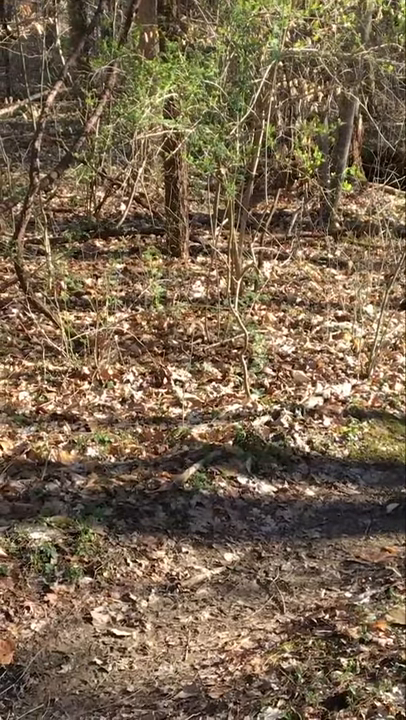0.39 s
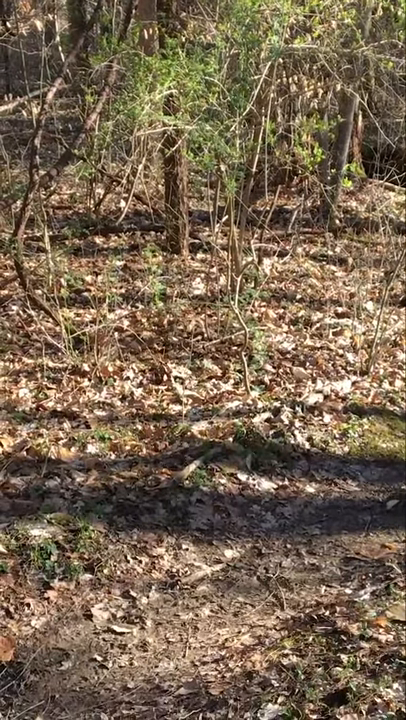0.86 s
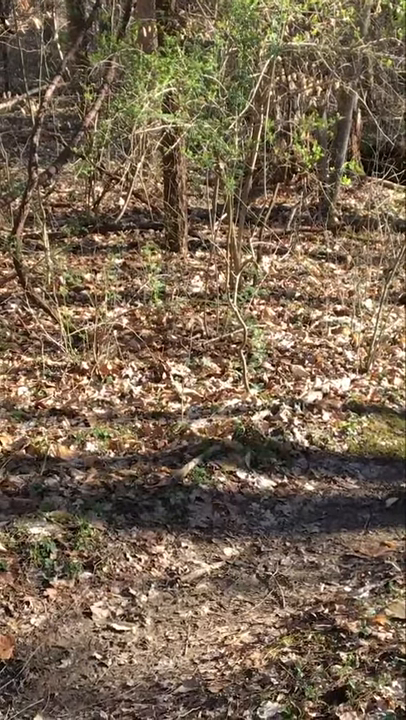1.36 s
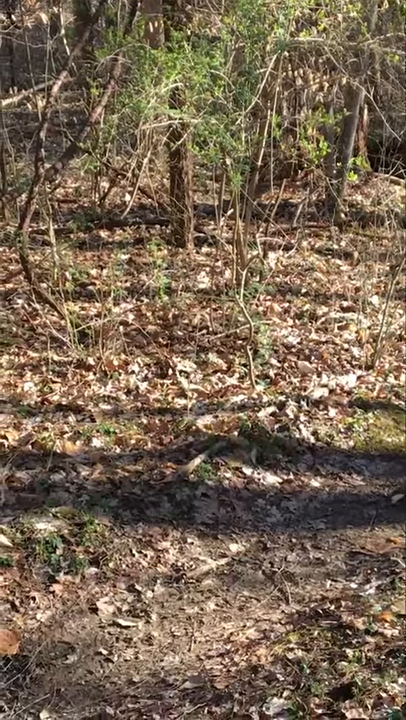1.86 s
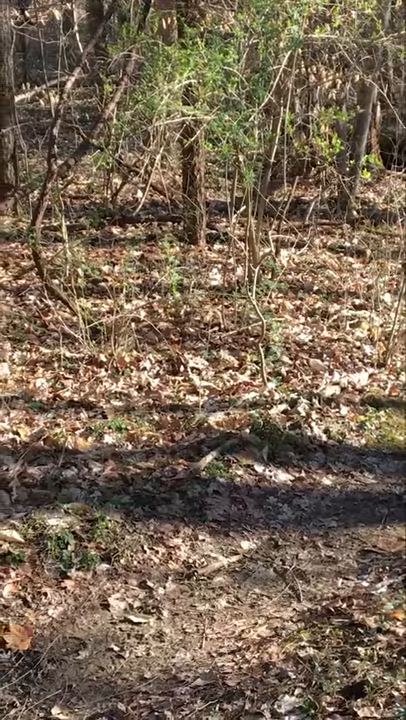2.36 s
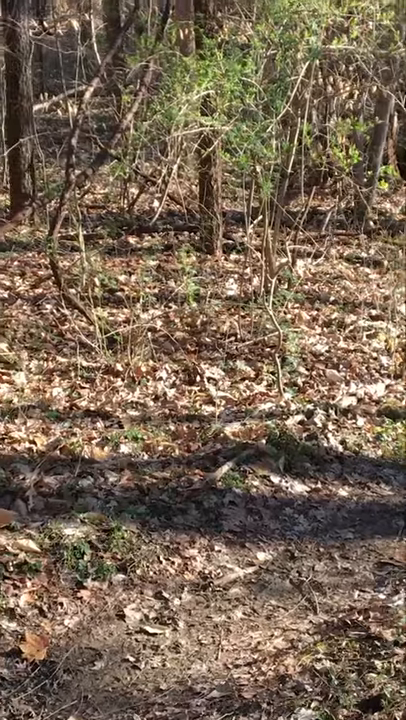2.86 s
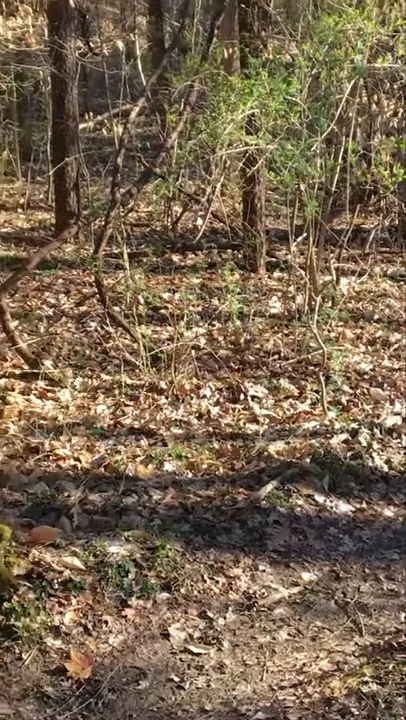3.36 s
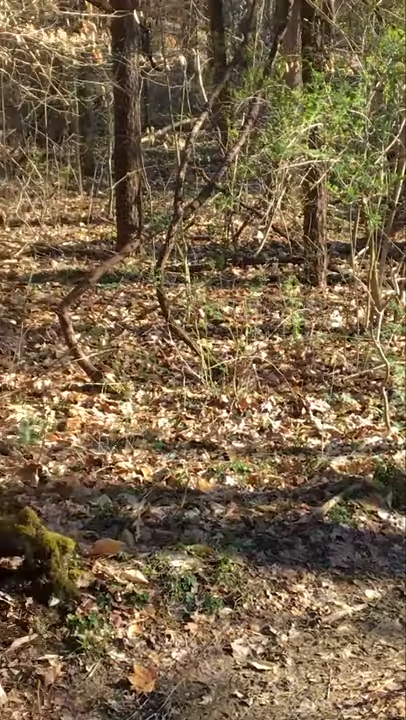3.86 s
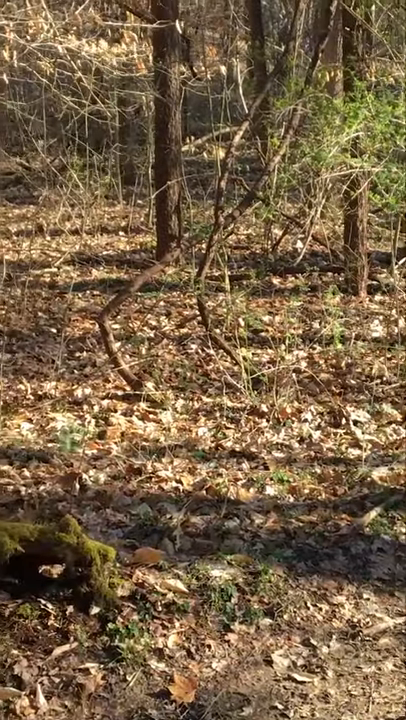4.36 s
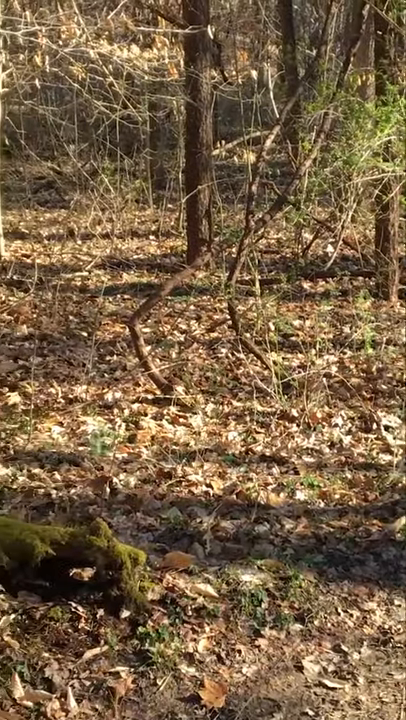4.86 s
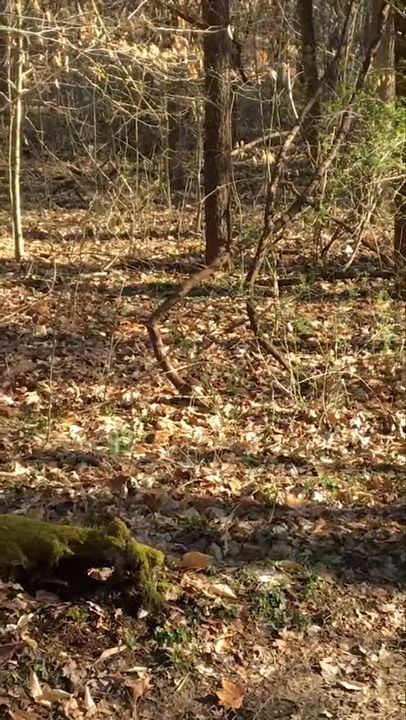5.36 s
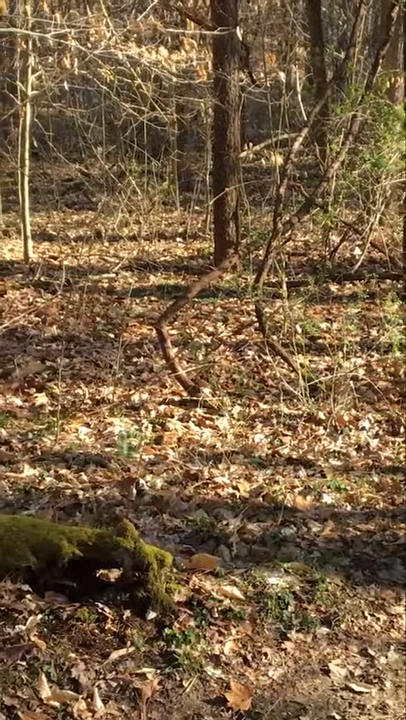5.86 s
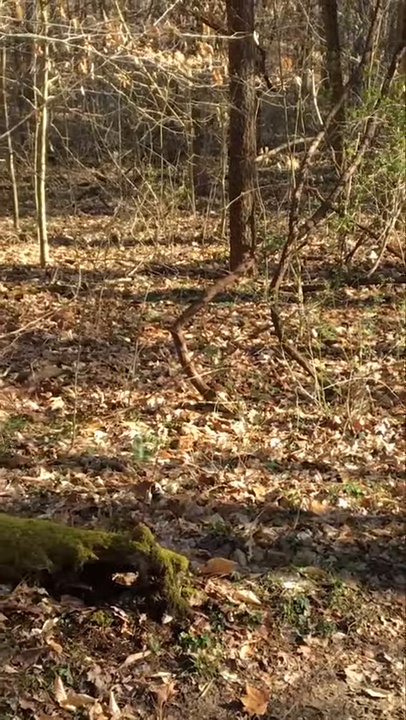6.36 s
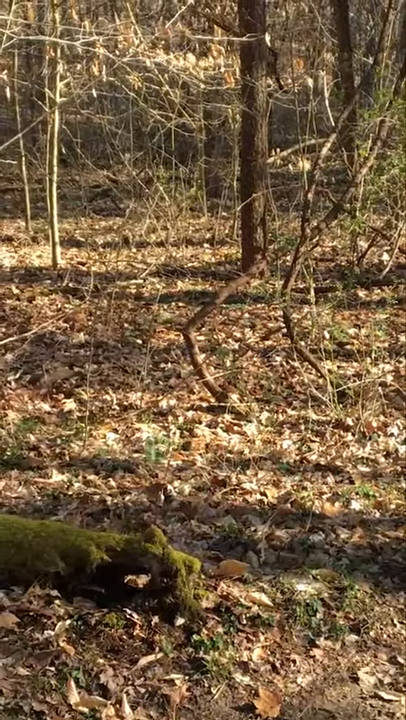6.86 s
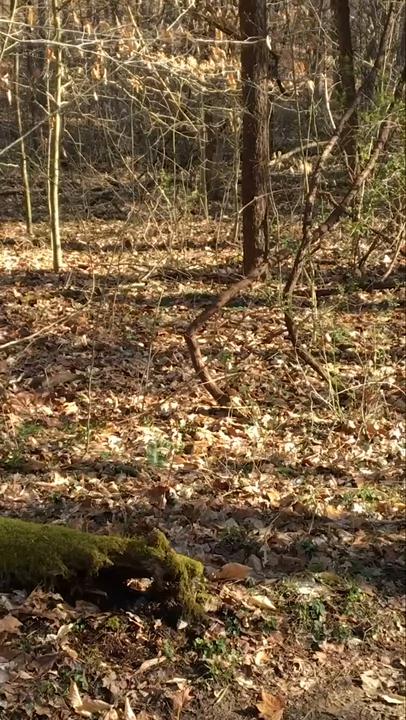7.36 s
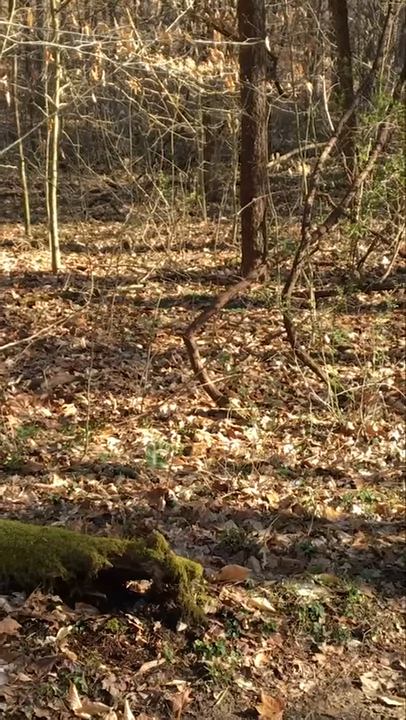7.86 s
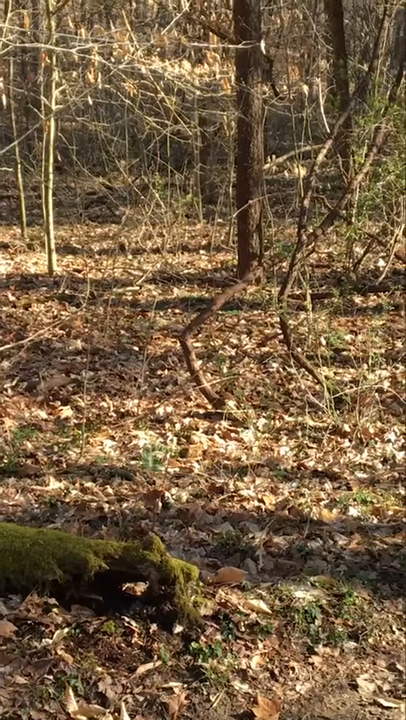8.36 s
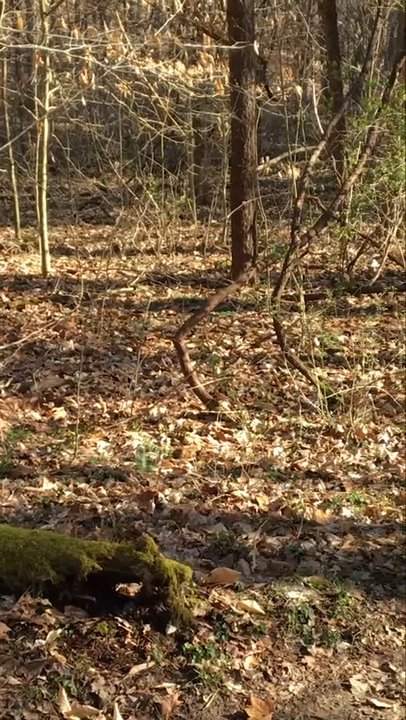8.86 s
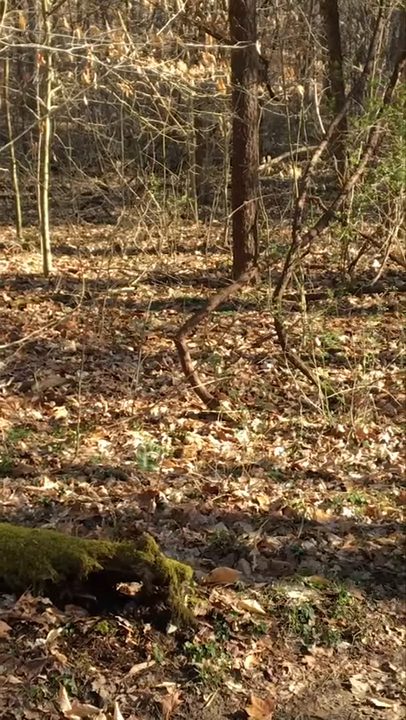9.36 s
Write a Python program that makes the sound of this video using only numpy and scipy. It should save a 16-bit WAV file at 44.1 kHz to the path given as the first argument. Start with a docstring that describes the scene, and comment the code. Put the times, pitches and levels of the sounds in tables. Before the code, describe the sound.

Small birds sing outdoors over a quiet, steady creek. First come spaced chips, then two strong downward slurs and a denser run of winding whistles, flicks and short burrs. Behind them another bird loops a low, wet-sounding phrase, then stops. More chips and falling whistles close the scene. Faint high notes come from distant birds, and dry twig snaps sound close to the handheld microphone.

```python
"""Songbirds trade whistled slurs, trills and sharp chip calls in a leafy wood, a third bird repeats a low
phrase further off and thin high notes come from distant singers. All are near-sine glides through listed
pitches. Random echoes scatter every note among trunks and leaves; filtered noise makes the rush of a creek
and a low rumble, and short noise bursts make the few twigs that tick near the microphone."""
import sys
import numpy as np
from scipy import signal
from scipy.fft import rfft, irfft
from scipy.io import wavfile
from scipy.ndimage import uniform_filter1d

SR = 44100
rng = np.random.default_rng(int(sys.argv[2]) if len(sys.argv) > 2 else 0)


def amplitude_ratio(level_db):
    """Convert a level in decibels to the matching linear amplitude (field) ratio."""
    exponent = np.asarray(level_db, float) / 20
    return 10 ** exponent


def transcribe(u):
    """Save the signal u as a 16-bit wav file named by the first command-line argument.

    u: samples, shape (n,) or (channels, n), limited to [-1, 1]; the rate is SR.
    q: integer samples, one column per channel.
    """
    v = np.clip(np.atleast_2d(u).T, -1, 1)
    q = np.round(v * 32767).astype(np.int16)
    wavfile.write(sys.argv[1], SR, q)


N = 418068


def walk(rate):
    """Random drift: levels held 1 / rate seconds and smoothed twice, with a spread near 1."""
    hold = int(SR / rate)
    held = np.repeat(rng.standard_normal(N // hold + 1), hold)
    return 1.92 * uniform_filter1d(uniform_filter1d(held, hold), hold)[:N]


def creek():
    """Rushing water and rumble: half-octave noise bands that swell together a little and flicker alone."""
    # Spectrum of water and rumble. Each row: frequency in Hz, relative density in dB per Hz.
    water_colour = [(12, -50), (20, -19), (39, -4.5), (60, 1), (86, -4.5), (113, -8.5), (158, -13),
                    (228, -13.5), (367, -17), (422, -22), (698, -23), (2530, -27), (5530, -37.5),
                    (8180, -37.5), (16000, -51)]
    creek_rms_db = -37.5
    hz = np.maximum(np.arange(N // 2 + 1) * SR / N, 1)
    points, db = np.transpose(water_colour)
    coloured = rfft(rng.standard_normal(N)) * amplitude_ratio(np.interp(np.log(hz), np.log(points), db))
    water, swell = 0, walk(0.8)
    for octave in np.arange(4, 14.6, .5):  # band centre is 2 ** octave Hz
        share = np.clip(1 - 2 * np.abs(np.log2(hz) - octave), 0, 1)
        flicker_db = 0.6 + 60 / 2 ** octave  # the lowest bands are the gustiest
        water = water + irfft(coloured * share, N) * amplitude_ratio(0.9 * swell + flicker_db * walk(9))
    return water * amplitude_ratio(creek_rms_db) / np.sqrt(np.mean(water ** 2))


def whistle(notes, round_s, edge_s, waver_db, order=(), partial_db=(), warble=0, top_hz=15500):
    """Near-sine notes: the pitch rounds its corners, the edges fade, weak partials ride along."""
    voice, waver = np.zeros(N), amplitude_ratio(waver_db * walk(120))
    warble = warble + np.zeros(N)
    for note in notes:
        s, hz, db = np.transpose(note)
        first = max(int((s[0] - edge_s) * SR), 0)
        i = np.arange(first, min(int((s[-1] + edge_s) * SR), N))
        t = i / SR
        pitch = uniform_filter1d(np.interp(t, s, hz), int(round_s * SR) + 1) + warble[i]
        phase = 2 * np.pi * np.cumsum(pitch) / SR
        edge = np.clip(np.minimum(t - s[0], s[-1] - t) / (2 * edge_s) + .5, 0, 1) ** 2
        # partials stay silent above top_hz
        upper = sum(amplitude_ratio(d) * (k * pitch < top_hz) * np.sin(k * phase) for k, d in zip(order, partial_db))
        voice[i] += np.sqrt(2) * amplitude_ratio(np.interp(t, s, db)) * edge * (np.sin(phase) + upper)
    return voice * waver


def strokes(shape, rows):
    """One gliding note a row, all with the same course in time."""
    share, way, shape_db = np.transpose(shape)
    return [np.transpose([s + share * length, first + way * (last - first), db + shape_db])
            for s, length, first, last, db in rows]


def far_notes():
    """Thin glides of distant birds, and the held end of one low phrase; the pitch trembles at random."""
    # A note starts firm and thins out. Each row: share of the length, share of the pitch change,
    # level in dB relative to the note.
    far_shape = [(0, 0.057, 5.5), (.4, .4, -1), (1, 0.94, -3.5)]
    # Each row: start in seconds, length in seconds, first pitch in Hz, last pitch in Hz, level in dB.
    # The flat 3.2 kHz row is the held end of the low singer's last syllable.
    thin_notes = [(.001, .2, 3200, 3140, -59), (.001, .12, 7940, 8080, -57.5),
                  (0.192, .08, 7650, 7500, -60), (.3, .035, 7130, 7090, -60),
                  (0.134, .135, 7960, 7930, -58), (.28, .06, 2140, 2180, -59), (.34, .057, 2180, 2640, -55),
                  (.37, .125, 8480, 8460, -51.5), (.47, .07, 3290, 4050, -59.5),
                  (.51, .03, 6600, 7100, -58), (0.551, .14, 8700, 8120, -50.5),
                  (.585, .03, 8350, 7600, -51), (.615, .06, 7600, 7850, -53),
                  (0.605, .03, 5590, 5760, -54.5), (.69, .108, 3720, 3830, -63),
                  (0.997, .03, 6800, 6810, -48), (1.08, .06, 2870, 3110, -59),
                  (1.137, .069, 3110, 4400, -56.5), (1.078, .04, 6900, 7050, -54),
                  (1.317, .04, 7380, 7230, -57), (1.601, .075, 8060, 8650, -57.5),
                  (1.95, .05, 8400, 8630, -58.5), (2.27, .056, 8300, 8160, -61),
                  (2.42, .02, 8500, 8510, -59), (2.763, .066, 7020, 7330, -62), (3.1, .04, 6750, 6800, -61),
                  (3.036, .135, 7620, 7770, -58.5), (3.242, .045, 8320, 7870, -60),
                  (3.699, .06, 10800, 12000, -56), (3.719, .07, 8360, 8300, -59),
                  (3.856, .1, 8420, 8530, -55), (4.084, .084, 7720, 7500, -54),
                  (4.399, .065, 7500, 6830, -54.5), (4.45, .062, 6950, 7230, -54),
                  (4.632, .078, 7960, 7550, -53), (4.903, .105, 7650, 8000, -54),
                  (5.18, .08, 8150, 7900, -49.5), (5.193, .012, 9410, 8180, -50),
                  (5.352, .036, 7900, 8000, -51), (5.491, .025, 7850, 6700, -47.5),
                  (5.51, .09, 8030, 7800, -52), (5.61, .015, 6800, 8200, -39),
                  (5.7, .08, 8480, 8470, -55.5), (5.91, .024, 7200, 7700, -48),
                  (6.427, .045, 5950, 5800, -53), (6.475, .023, 5840, 6640, -48),
                  (6.737, .093, 3180, 3250, -53), (6.84, .03, 8920, 7190, -50),
                  (6.872, .05, 9000, 8900, -57), (6.888, .024, 8300, 6860, -47.5),
                  (6.93, .018, 7940, 6580, -48), (7.21, .039, 744, 1200, -51), (7.55, .1, 7870, 7700, -62),
                  (7.734, .12, 7280, 6960, -58.5), (7.975, .123, 7550, 7200, -60),
                  (8.244, .115, 7230, 7400, -61), (8.447, .1, 7260, 7050, -59),
                  (8.511, .03, 766, 1000, -50), (8.69, .069, 7340, 7200, -59),
                  (8.812, .043, 6900, 7000, -55), (9.02, .021, 7650, 8050, -50)]
    return whistle(strokes(far_shape, thin_notes), 0.0085, 0.007, 2.6, warble=45 * walk(150))


def chips():
    """Steep falls that bob up; high chips climb on without the dip, a line at 1.5 times the pitch is harsh."""
    # After its steep fall a chip rounds off, bobs up, dips and weakens, then climbs again a little louder.
    # Each row: seconds from the lowest point, level in dB relative to the chip.
    chip_shape = [(-.0021, 2), (0, -4), (.0047, 2.5), (.0078, -7), (0.0148, -2.5)]
    # Each row: lowest point in seconds, lowest pitch in Hz, bob in Hz, end in Hz, level in dB.
    chip_calls = [(0.1385, 4620, 5590, 7740, -25.5), (.3665, 3700, 5400, 5970, -21),
                  (0.885, 3990, 5700, 7060, -20), (1.845, 4480, 5760, 7000, -29.5),
                  (3.023, 3940, 5350, 6340, -31.5), (3.2988, 4463, 5560, 7600, -25),
                  (5.1267, 3650, 5130, 6500, -29.5), (5.382, 5220, 7030, 8450, -30.5),
                  (5.634, 6760, 8230, 9300, -35), (5.701, 3290, 4460, 4480, -29.5),
                  (6.2, 4240, 6320, 6950, -36), (7.934, 3470, 5400, 5630, -22.5),
                  (8.590, 4080, 6180, 7700, -22)]
    top_hz, top_db, round_hz, fall_hz_per_s = 9000, -13.5, 1500, 990000
    dip_hz, high_chip_hz = 976, 5000
    lag, shape_db = np.transpose(chip_shape)
    notes = []
    for s, low, bob, end, db in chip_calls:
        fall_s = max(top_hz - low - round_hz, 100) / fall_hz_per_s
        dip = bob - dip_hz if low < high_chip_hz else (bob + end) / 2
        times = s + np.r_[lag[0] - fall_s, lag]
        pitches = [top_hz, low + round_hz, low, bob, dip, end]
        notes.append(np.transpose([times, pitches, db + np.r_[top_db, shape_db]]))
    return whistle(notes, 0.0014, .0005, 1.2, order=(1.5, 2, 3), partial_db=(-20, -30, -42))


def glides():
    """Single strokes of the song: short drops, rises, held notes and tumbles."""
    # Courses of the strokes. Each row: share of the length, share of the way from first to last pitch,
    # level in dB relative to the stroke.
    drop_shape = [(0, 0.092, 0), (.33, 0.32, 0), (.72, .8, -2.5), (1, 1, -15.5)]
    rise_shape = [(0, 0, 3.5), (.5, .6, -8), (1, 1, -9)]
    hold_shape = [(0, 0.14, -5.5), (.3, 0.16, 1), (.7, .7, -2), (1, 1, -1)]
    tumble_shape = [(0, 0.0069, -12.5), (.27, .17, -7.5), (.58, .41, -6), (.75, .66, -2), (.81, .76, 2),
                    (.88, .92, -4), (1, 0.94, -10)]
    # Strokes as sung. Each row: start in seconds, length in seconds, first pitch in Hz, last pitch in Hz,
    # level in dB.
    sung_drops = [(0.405, .015, 7600, 3670, -33.5), (1.372, .023, 6300, 2190, -39),
                  (4.718, 0.02, 8640, 2110, -28.5), (4.773, 0.026, 9250, 2090, -28),
                  (5.616, .019, 4880, 1954, -33.5), (6.64, 0.029, 6210, 1600, -35),
                  (7.364, .04, 7800, 2200, -49), (7.857, 0.024, 6200, 2240, -48)]
    sung_rises = [(5.42, 0.098, 2890, 4880, -37.5), (5.511, .016, 2900, 7700, -32),
                  (5.607, .01, 2970, 4900, -24.5)]
    sung_holds = [(0.351, 0.051, 6660, 7780, -32), (1.4, 0.034, 3200, 3100, -46),
                  (1.47, 0.14, 7700, 8100, -55), (5.43, 0.085, 2230, 2860, -37.5),
                  (5.525, .02, 7300, 8040, -40), (5.898, .027, 5400, 5100, -46),
                  (6.105, .025, 2660, 2800, -43), (6.255, 0.089, 3240, 2970, -42.5),
                  (9.078, 0.0087, 6440, 7950, -37), (9.086, 0.018, 7950, 7550, -45),
                  (9.347, .013, 6550, 7300, -36.5)]
    sung_tumbles = [(6.742, .122, 8780, 1760, -37), (7.44, .064, 7790, 1880, -36)]
    return (strokes(drop_shape, sung_drops) + strokes(rise_shape, sung_rises)
            + strokes(hold_shape, sung_holds) + strokes(tumble_shape, sung_tumbles))


def hooks():
    """Notes that flick up, dip and climb again, all from the same starting pitch."""
    # Each row: seconds from the start, level in dB relative to the hook.
    hook_shape = [(0, -2.5), (.012, -2), (0.021, 1), (.049, -8)]
    # Each row: start in seconds, top in Hz, dip in Hz, end in Hz, level in dB.
    sung_hooks = [(1.179, 9000, 6950, 8700, -39.5), (1.848, 8820, 6900, 8760, -40),
                  (7.072, 7840, 5380, 8800, -38), (7.7, 9000, 6920, 8500, -42.5)]
    start_hz = 4700
    lag, shape_db = np.transpose(hook_shape)
    return [np.transpose([s + lag, [start_hz, *hz], db + shape_db]) for s, *hz, db in sung_hooks]


def syllables(shape, rows):
    """A learnt syllable, stretched, shifted in pitch and swelling more or less each time."""
    share, hz, shape_db = np.transpose(shape)
    return [np.transpose([s + share * length, ratio * hz, db + depth * shape_db])
            for s, length, ratio, db, depth in rows]


def arches_and_zigzags():
    """Two learnt syllables: one arches over and falls, the other falls, climbs and falls again."""
    # Each row: share of the length, pitch in Hz before the ratio, level in dB before the swell depth.
    arch_shape = [(0, 6280, -15), (.085, 6800, -14), (.2, 7126, -7), (.42, 7060, -5.5), (.54, 6580, -5.5),
                  (.68, 5270, 2), (.76, 4900, -1.5), (1, 4780, -8.5)]
    zigzag_shape = [(0, 7490, -24), (.05, 6940, -11), (.17, 5080, -3), (.31, 4010, -2.5), (.38, 3890, -3.5),
                    (.45, 4000, -7.5), (.62, 5000, -11), (.73, 5260, 1.5), (.78, 5000, -5.5),
                    (.86, 4140, 3.5), (.91, 3860, -0.5), (1, 3800, -5)]
    # Each row: start in seconds, length in seconds, pitch ratio, level in dB, swell depth as a factor.
    sung_arches = [(2.132, .153, 1.001, -24, 1.01), (8.35, .16, 1.03, -38, 0.71)]
    sung_zigzags = [(4.01, .174, 1.001, -20, 1.01), (9.348, .16, 1.045, -30.5, 1.16)]
    return syllables(arch_shape, sung_arches) + syllables(zigzag_shape, sung_zigzags)


def slurs():
    """The same falling pitch each time: slurs open thin, swell to full voice at their own moment, then sag."""
    # Each row: share of the length, pitch in Hz before the ratio.
    slur_course = [(0, 7800), (.07, 7230), (.2, 6910), (.42, 6290), (.6, 5800), (.8, 4900), (.93, 4540),
                   (1, 4560)]
    # Each row: start in seconds, length in seconds, pitch ratio, full level in dB, full voice at seconds.
    sung_slurs = [(3.344, 0.15, 1.026, -21, 3.437), (3.686, 0.17, 1.007, -19.5, 3.757),
                  (8.928, 0.17, 1.015, -25, 9.056), (9.362, .2, 1.01, -32.5, 9.42)]
    open_db, swell_db_per_s, sag_db_per_s = -43, 308, 20
    share, notes = np.linspace(0, 1, num=40), []
    course_hz = np.interp(share, *np.transpose(slur_course))
    for s, length, ratio, db, full_s in sung_slurs:
        t = s + share * length
        swell_db = swell_db_per_s * np.maximum(full_s - t, 0)
        sag_db = sag_db_per_s * np.maximum(t - full_s, 0)
        notes.append(np.transpose([t, ratio * course_hz, np.maximum(db - swell_db - sag_db, open_db)]))
    return notes


def song():
    """Slurred whistles; in places the pitch swings quickly, a trill when slow and a burr when fast."""
    # Quick swings of pitch. Each row: start in seconds, end in seconds, rate in Hz, swing in Hz.
    pitch_swings = [(1.396, 1.447, 99.4, 900), (1.465, 1.598, 90, 800), (3.451, 3.49, 420, 130),
                    (3.794, 3.852, 415, 191), (5.772, 5.875, 83.2, 300), (6.251, 6.34, 99.8, 1000),
                    (6.734, 6.839, 90.6, 506), (7.443, 7.473, 99, 300), (9.055, 9.093, 430, 80)]
    # Winding syllables sung once, one list each. Each row: time in seconds, pitch in Hz, level in dB.
    winding_figures = [
        [(.72, 6700, -50), (.759, 7040, -45), (.807, 7370, -44), (.832, 7140, -50), (.845, 7010, -32),
         (.856, 5660, -45), (.862, 3990, -32), (.877, 1880, -41)],
        [(4.292, 2730, -30), (4.312, 3130, -29.5), (4.333, 4250, -22), (4.346, 4445, -23), (4.365, 3870, -25),
         (4.379, 2490, -33), (4.392, 2610, -33), (4.41, 3220, -28), (4.425, 3390, -30)],
        [(4.497, 2425, -40), (4.509, 5480, -23.5), (4.52, 5270, -21), (4.545, 5240, -24.5), (4.557, 5260, -37),
         (4.576, 5110, -33), (4.601, 3836, -25.5), (4.623, 3120, -29), (4.628, 3120, -34)],
        [(4.85, 2470, -33.5), (4.872, 3130, -26.5), (4.888, 7320, -37), (4.909, 6900, -31.5),
         (4.951, 4870, -25), (4.993, 3210, -30), (5.03, 2210, -39)],
        [(5.25, 3103, -21), (5.258, 6170, -42), (5.28, 6940, -48), (5.291, 5930, -46.8), (5.301, 3480, -31)],
        [(5.255, 2935, -29), (5.275, 3970, -40), (5.304, 2320, -40)],
        [(5.775, 6890, -48), (5.805, 6380, -41), (5.845, 7250, -44), (5.874, 8600, -42), (5.885, 7770, -40),
         (5.895, 3580, -31.5), (5.92, 2400, -42.5), (5.964, 1843, -45)],
        [(6.05, 2310, -34), (6.065, 4380, -33.5), (6.071, 8000, -49), (6.08, 9150, -52), (6.105, 6620, -43),
         (6.13, 6300, -54)],
        [(6.412, 2910, -46), (6.42, 8260, -39), (6.432, 5400, -45), (6.457, 3830, -31.5), (6.465, 3700, -36),
         (6.473, 4360, -40), (6.503, 7850, -50), (6.525, 8240, -39), (6.53, 7960, -45)],
    ]
    t, warble = np.arange(N) / SR, np.zeros(N)
    for start, end, rate_hz, swing_hz in pitch_swings:
        swell = np.clip(np.minimum(t - start, end - t) / 0.0065, 0, 1)
        warble += swing_hz * swell * np.sin(2 * np.pi * rate_hz * (t - start))
    notes = slurs() + arches_and_zigzags() + glides() + hooks() + winding_figures
    return whistle(notes, 0.0022, .003, 1.5, order=(2, 3), partial_db=(-33.5, -42), warble=warble)


def twigs():
    """Dry snaps: a noise burst of a millisecond or two, filtered to a band of its own."""
    # Each row: time in seconds, peak in dB, upper band edge in Hz.
    twig_ticks = [(.744, -40, 7000), (1.243, -36, 3000), (2.465, -27, 2400), (2.505, -38, 2000),
                  (3.62, -29, 4700), (3.654, -27.5, 4800), (4.29, -36, 9000), (6.569, -35, 5460),
                  (9.259, -39, 9000), (9.319, -40, 5960)]
    ticks, t = np.zeros(N), np.arange(400) / SR
    bursts = rng.standard_normal((len(twig_ticks), len(t))) * np.exp(-t / 0.0021)
    for (s, db, hz), burst in zip(twig_ticks, bursts):
        band = signal.butter(1, [hz / 2.7, hz], "bandpass", fs=SR, output="sos")
        snap = signal.sosfilt(band, burst)
        start = int(s * SR)
        ticks[start:start + len(t)] += amplitude_ratio(db) * snap / np.abs(snap).max()
    return ticks


def low_singer():
    """The same phrase over and over, each syllable with its own strength; a slope throws it back once."""
    # Three syllables, falling, rising and last. Each row: seconds from the last syllable, pitch in Hz,
    # level in dB relative to the syllable.
    phrase_shape = [
        [(-.2, 1705, -5), (-.17, 1519, -0.5), (-.14, 1270, -2.5), (-.12, 1290, -10)],
        [(-.115, 1500, -22), (-.085, 1760, -2), (-.052, 2060, -1), (-.025, 2648, 8)],
        [(0, 3860, -1.5), (.0075, 3150, 6.5), (.02, 3198, -13), (.045, 3220, -19)],
    ]
    # Each row: last syllable in seconds, then levels of the falling, rising and last syllable in dB.
    phrase_repeats = [(4.231, -56, -57, -41.5), (4.528, -70, -52, -34.5), (4.919, -51, -42, -33),
                      (5.229, -49, -40.5, -29.5), (5.529, -54, -38.5, -31), (5.818, -53, -41, -33.5),
                      (6.122, -51, -40, -32), (6.418, -51, -40, -35), (6.733, -54, -47, -44.5)]
    echo_s, echo_db = .048, -11.5
    notes = [np.array(syllable) + (s, 0, db)
             for s, *levels in phrase_repeats for syllable, db in zip(phrase_shape, levels)]
    voice = whistle(notes, 0.0019, .004, 0.99)
    return voice + amplitude_ratio(echo_db) * np.roll(voice, int(echo_s * SR))


def wood(x, near_db, near_s, tail_db, low_t60, high_t60):
    """Direct sound, quick scatter from leaves and ground, then the long scatter of trunks, treble fading apart.
    The echoes cross into a new random pattern every change_s, so no single colouring lasts."""
    length_s, change_s = 1.2, .3
    t, hop = np.arange(int(length_s * SR)) / SR, int(change_s * SR)
    quick = np.exp(-t / near_s) / np.sqrt(near_s * SR / 2)
    low_fade, high_fade = [np.exp(-np.log(1000) * t / t60) for t60 in (low_t60, high_t60)]
    split = signal.butter(2, 5500, fs=SR, output="sos")
    window = np.sqrt(np.hanning(2 * hop))
    x, echoes = np.pad(x, (hop, 2 * hop)), np.zeros(N + 3 * hop + len(t))
    for i in range(0, N + hop, hop):
        near, noise = rng.standard_normal((2, len(t)))
        low = signal.sosfilt(split, noise)
        tail = (low * low_fade + (noise - low) * high_fade) * np.minimum(t / 0.011, 1)
        tail = tail / np.sqrt(np.sum(tail ** 2))
        response = amplitude_ratio(near_db) * quick * near + amplitude_ratio(tail_db) * tail
        echo = signal.fftconvolve(x[i:i + 2 * hop] * window, response)
        echoes[i:i + len(echo)] += echo
    return (x + echoes[:len(x)])[hop:hop + N]


def scene():
    """Each group of sounds sits at its own distance, so each has its own share of echo."""
    singers = wood(song(), -4.5, 0.02, -12.0, 0.34, 0.62)
    callers = wood(chips(), -0.55, 0.0074, -10.5, 0.29, 0.53)
    low = wood(low_singer(), -7, 0.021, -2.6, 1.0, 0.56)
    far = wood(far_notes(), 0, 0.017, -0.5, 0.89, 0.57)
    ticks = wood(twigs(), 0, 0.0021, -1, 0.66, 0.42)
    return (singers + callers + low + far + ticks + creek())[None]


def top_cut(x):
    """Nothing passes above the cut-off."""
    return signal.sosfilt(signal.butter(12, 16180, fs=SR, output="sos"), x)


def record(dry):
    """A small hand-held recorder: a slightly bending, coloured microphone and a cut top."""
    # Peaks and dips of the capsule. Each row: centre in Hz, width in Hz, gain in dB.
    capsule_colour = [(2900, 380, -3), (8300, 2300, -2), (10430, 350, -5), (12000, 5100, 2.5)]
    top_hz = 15830
    hz = np.arange(N // 2 + 1) * SR / N
    colour_db = sum(db * np.exp(-((hz - centre) / width) ** 2) for centre, width, db in capsule_colour)
    # loud notes and their echoes multiply into a haze of sum tones, heard around the capsule's treble peak
    bend = rfft(dry ** 2 + 3.0 * dry ** 3)
    haze = amplitude_ratio(-1.0) * bend * np.exp(-((hz - 11800) / 2500) ** 2)
    heard = irfft((rfft(dry) + haze) * amplitude_ratio(colour_db) * (hz < top_hz), N)
    return top_cut(heard)


dry = scene()
out = record(dry)
transcribe(out)
```